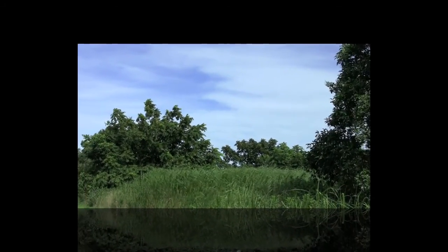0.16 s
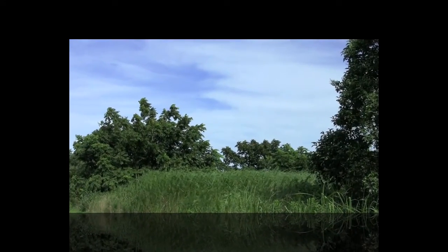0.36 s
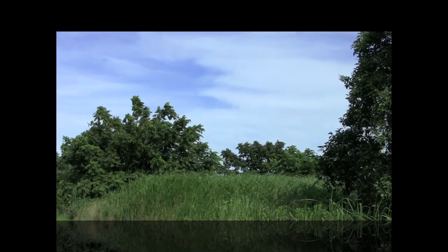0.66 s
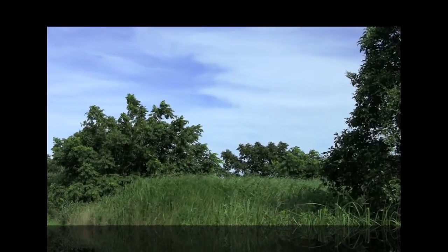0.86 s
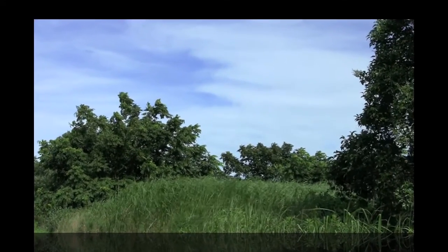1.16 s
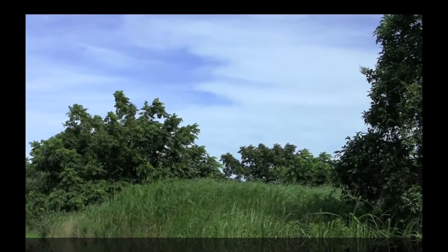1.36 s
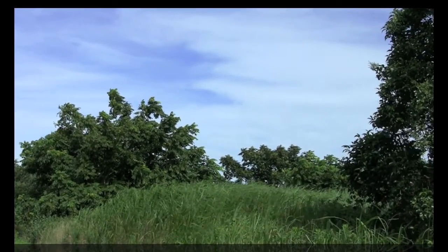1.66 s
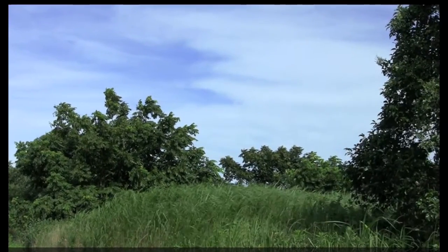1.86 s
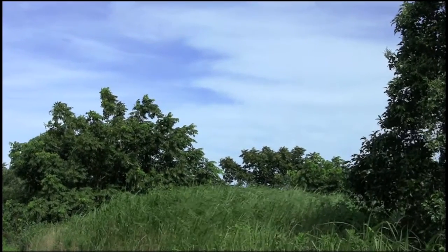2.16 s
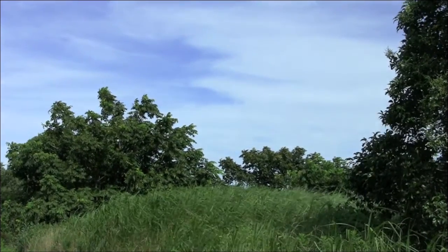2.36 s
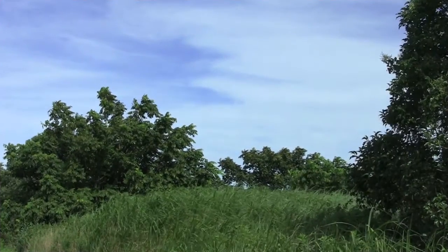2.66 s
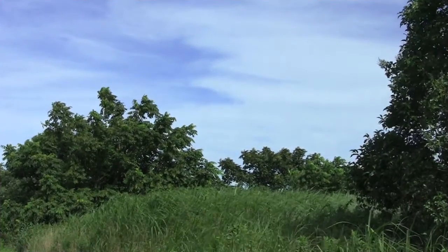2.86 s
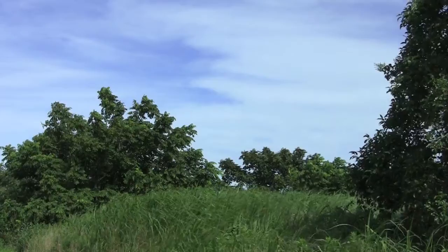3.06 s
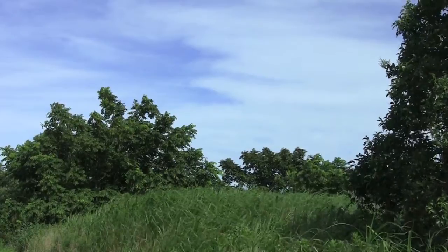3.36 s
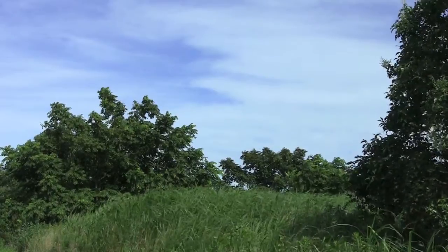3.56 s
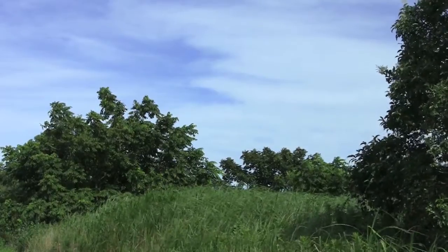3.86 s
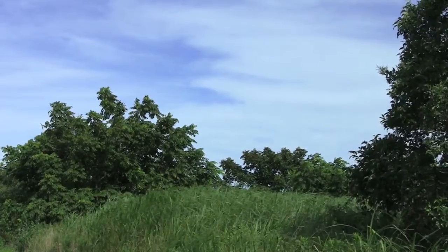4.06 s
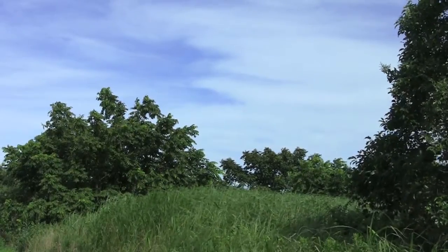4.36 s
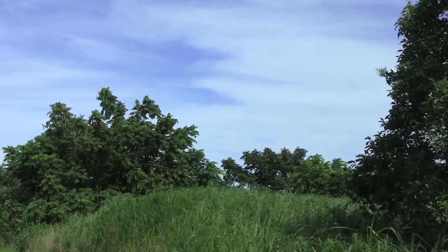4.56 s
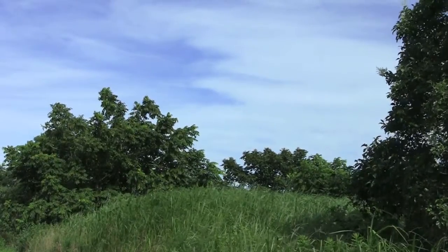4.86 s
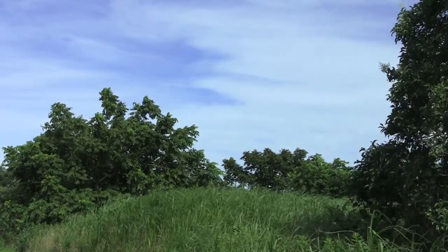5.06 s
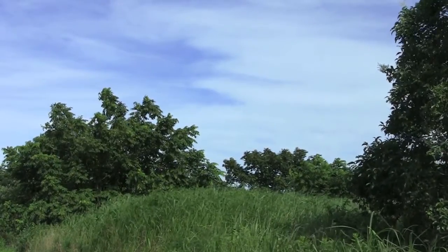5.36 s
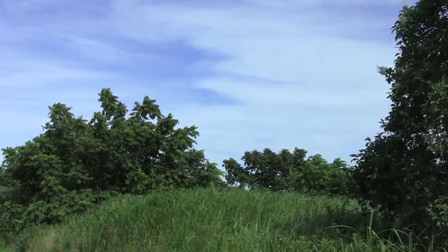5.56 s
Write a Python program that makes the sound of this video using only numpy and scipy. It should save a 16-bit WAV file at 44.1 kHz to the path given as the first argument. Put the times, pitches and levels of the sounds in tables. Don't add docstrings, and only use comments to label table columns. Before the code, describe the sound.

A quiet outdoor scene of tall grass, bushes and trees under a cloudy blue sky. Throughout, a light breeze turns countless leaf contacts into a soft, even hiss, strongest around 2 to 4 kHz, with small uneven flutters and only slight swells near 3 s and the end. Dry stems tick at 0.05 s and snap crisply close by at about 0.3 s. From 0.5 to 1.1 s a cricket scrapes faint, rapid strokes near 8 kHz, strongest around 0.8 to 0.9 s, mixed with light ticks; one more tick comes near 3 s. Below, distant traffic gives a dull, gently swelling rumble and hum. From 2 s a far heavy engine faintly rises in pitch, dips at a gear change around 4.6 s and eases off at 4.9 s. The sound is nearly mono from a camera microphone, with slightly flickering top treble, a steep cut near 15.7 kHz and tiny momentary stereo differences.

```python
import sys
import numpy as np
from scipy import signal
from scipy.fft import rfft, irfft
from scipy.io import wavfile
from scipy.ndimage import uniform_filter1d

SR = 44100
rng = np.random.default_rng(int(sys.argv[2]) if len(sys.argv) > 2 else 0)


def ratio_of_db(decibels):
    return 10 ** (np.asarray(decibels, float) / 20)


def inscribe(sig):
    pcm = np.round(np.clip(np.atleast_2d(sig).T, -1, 1) * 32767)
    wavfile.write(sys.argv[1], SR, pcm.astype(np.int16))


N = 252252

# t/s, level/dB
WIND_LEVEL = [ (0, -43.5), (.6, -43.5), (1.3, -44), (1.9, -44), (2.5, -43), (3.0, -42), (3.45, -42.5),
              (3.95, -42.5), (4.5, -43), (5.0, -43), (5.4, -42), (5.72, -42)]
# f/Hz, density/dB per Hz
LEAF_SPECTRUM = [(470, -40), (800, -20), (914, -10.5), (1180, -6), (1460, -7.5), (2010, -2), (2750, -1),
                 (3180, -1), (3580, -4.5), (4090, -3.5), (10300, -17), (14400, -27)]
# f/Hz, width/Hz, level/dB
CROWN_MODES = [(3170, 590, 2), (890, 71, 3.5), (2765, 400, -2.5), (2150, 91, -0.5), (4060, 180, 0.7),
               (7140, 1200, -1.55)]
# t/s, half length/s, lift/dB, patch pitch f/Hz
PATCH_FLURRIES = [(.045, .03, -1, 11000), (.2, .04, 2, 3000), (0.28, .03, 2.5, 5500),
                  (1.76, 0.049, 2.5, 3460), (2.4, 0.11, 1.1, 1800), (2.75, .03, 1, 2300),
                  (3.217, 0.036, 2.5, 10000), (3.65, .12, 2.5, 7800), (4.14, .03, 2, 3500),
                  (4.4, .03, -0.5, 2500), (4.74, .07, 1.5, 9000), (4.8, 0.19, 1.5, 1500),
                  (5.55, 0.14, 0.5, 3600), (0.54, .1, -1, 3400), (4.4, .08, 0, 3100),
                  (3.602, .08, -1, 3100), (1.25, 0.14, 2.5, 800), (1.52, .1, -1.5, 1900),
                  (4.95, 0.079, 0.5, 3000), (5.4, .12, 1, 1100), (0.99, 0.028, 5.5, 890),
                  (3.1, 0.18, 0, 5500), (3.52, 0.074, 1.5, 4500), (3.9, .1, 0.5, 1560),
                  (1.06, 0.093, -1, 1200), (4.25, .1, 0, 6000), (3.53, 0.092, -0.5, 2800),
                  (5.47, .1, -1, 1900), (4.25, .1, 0.5, 3150), (0.36, .07, -0.5, 3300),
                  (1.86, .06, -0.5, 3000)]
LEAF_FOLLOW, GRASS_FOLLOW, BLADE_FOLLOW = 1, 1.2, 0.57
HISS_DB, FLURRY_OCTAVES = -44.5, 0.89

# closest t/s, half length/s, rumble lift/dB, tyre roar lift/dB
PASSES = [(.0, 0.21, 2, 1), (.85, 0.86, 3, 3.5), (1.6, 0.15, -6, 0), (2.097, 0.65, 4, 1.1),
          (1.85, .12, -0.5, 0), (2.45, 0.16, -1.5, -0.5), (3.2, 0.16, 2, 0), (3.9, 0.24, 1.5, 1.9),
          (4.3, .15, 3, 0.5), (4.65, 0.066, -6, 0), (5.15, 0.48, 2, 0), (5.4, .2, 0.5, 1.6)]
# f/Hz, density/dB per Hz
ROAD_SPECTRUM = [(15, -51), (25, -39), (32, -44), (40, -28.5), (86, -11.5), (134, 0.5), (153, -0.5),
                 (227, -12.5), (335, -15), (461, -10), (590, -15.5), (800, -15), (1040, -34), (1760, -120)]
# f/Hz, width/Hz, level/dB
VALLEY_MODES = [(417, 64, -4), (475, 47, 2), (233, 21, -2), (254, 12, 1.5), (347, 20, -2.5), (452, 16, 0.5),
                (552, 30, -2)]
SUB_DB, RUMBLE_DB, HUM_DB, HUM_RISE_DB_PER_S, ROAR_DB = -59.5, -62, -60, 0.22, -63
TREAD_HZ, TREAD_WIDTH_HZ, TREAD_DB, TREAD_FOLLOW = 1224, 106, -78, 4.2

# t/s, peak level/dB, ring f/Hz
STEM_TICKS = [(.048, -48, 10800), (.049, -51, 10100), (.245, -48, 7750), (.815, -52, 9200),
              (.823, -51, 9400), (.885, -52, 9000), (.618, -59, 11800), (.641, -49, 6600),
              (.648, -56, 11800), (.648, -55, 10200), (.682, -58, 11800), (.737, -56, 11700),
              (.868, -50, 11800), (.886, -56, 11600), (1.008, -53, 10100), (1.139, -54, 9000),
              (1.139, -49, 7300), (1.145, -51, 7300), (2.955, -47, 8000)]
TICK_T60_S = 0.013
# (ring f/Hz, peak level/dB, t60/s)
STEM_SNAPS = [
    (.2805, [(3400, -40, .008), (4200, -36.5, .013), (5350, -35, .009), (6900, -42, .006), (8100, -43, .007), (8700, -42, .009)]),
    (.2818, [(4750, -44, .005), (5350, -41, .008), (6100, -45, .005), (8600, -47, .006)]),
    (.303, [(4050, -39.5, .012), (5300, -46, .008), (6900, -49, .006), (7800, -48, .007), (8600, -48, .007), (9600, -51, .006)]),
    (.3045, [(4200, -41, .03)]),
    (.318, [(3100, -43, .012), (4600, -45, .01), (6300, -48, .007), (7300, -50, .006)]),
]

# t/s, peak level/dB, ring f/Hz
CRICKET_STROKES = [(.487, -50, 8300), (.503, -51, 8350), (.5194, -50, 8170), (.535, -51, 8200),
                   (.5651, -51, 8230), (.738, -51, 8500), (.762, -51, 8500), (.7801, -47, 8450),
                   (.797, -49, 8300), (.814, -45, 8440), (.823, -45, 8500), (.843, -43, 8400),
                   (.849, -48, 8300), (.8699, -43, 8300), (.885, -48, 8300), (.9043, -43, 8150),
                   (.913, -45, 8300), (.95, -54, 8100), (.9742, -44, 8010), (.997, -52, 8200),
                   (1.065, -46.5, 8350), (1.093, -51, 8400), (1.1134, -50, 8220)]
# start t/s, end t/s, wing tone level/dB, overtone level/dB
WING_RUBS = [
    (.46, .58, -65.5, -80),
    (.63, .76, -74, -73),
    (.76, .925, -63.5, -73),
    (.93, 1.15, -69, -75),
]
RUB_FADE_S = 0.027

# multiple, level/dB, fade-in t/s, fade-out t/s
ENGINE_MULTIPLES = [(5, -15, 2.25, 4.0), (7, -14, 2.3, 4.8), (9, -1, 2.3, 4.0), (10, 0, 1.9, 5.0),
                    (12, -7, 2.2, 4.3)]
ENGINE_START_S, ENGINE_HZ, PULL_HZ_PER_S, PULL_FADE_HZ_PER_S2 = 2, 12.98, 1.04, .105
ENGINE_DB, SWELL_S, LIFT_OFF_S, COAST_DB = -61.5, 0.58, 4.94, -12
GEAR_CHANGE_S, GEAR_DIP_DB = 4.6, -5.5

# low f/Hz, high f/Hz, share of blocks kept/0-1, level/dB
TREBLE_BANDS = [(13300, 13600, .98, 0), (13600, 13750, .95, 0), (13750, 13900, .93, 0),
                (13900, 14050, .9, 0), (14050, 14200, .88, 0), (14200, 14350, .85, 0),
                (14350, 14500, .88, 0), (14500, 14700, .14, -1), (14700, 14900, .1, -1),
                (14950, 15180, .08, 1), (15120, 15750, .27, -10)]
# t/s, centre f/Hz
STEREO_SLIPS = [(.988, 7000), (1.523, 6100), (2.684, 5500), (2.707, 12100), (3.125, 4800), (3.125, 9000),
                (3.137, 11000), (3.148, 10700), (3.938, 10400), (4.983, 5000), (4.983, 10400),
                (4.983, 13200), (5.215, 11400), (5.517, 8300)]
SLIP_WIDTH_HZ, SLIP_DB = 1540, -2
CONVERTER_OFFSET = -.0003


def unit(x):
    return x / np.sqrt(np.mean(x ** 2))


def curves(table):
    s, *columns = np.transpose(table)
    return [np.interp(np.arange(N) / SR, s, c) for c in columns]


def band(x, lo_hz, hi_hz, edge=0.35):
    freq = np.fft.rfftfreq(len(x), 1 / SR)
    slope = 2 ** (max(edge, .002) / 2)

    def rise(hz):
        return np.interp(freq, [hz / slope, hz * slope], [0, 1])

    return irfft(rfft(x) * (rise(lo_hz) - rise(hi_hz)), len(x))


def colour(x, points):
    hz, db = np.transpose(points)
    log_freq = np.log(np.fft.rfftfreq(N, 1 / SR) + 1)
    return irfft(rfft(x) * ratio_of_db(np.interp(log_freq, np.log(hz), db)), N)


def resonate(x, modes):
    for hz, width_hz, db in modes:
        x = x + (ratio_of_db(db) - 1) * signal.lfilter(*signal.iirpeak(hz, hz / width_hz, SR), x)
    return x


def walk(rate):
    hold = int(SR / rate)
    steps = np.repeat(rng.standard_normal(N // 100), hold)[:N]
    return unit(uniform_filter1d(uniform_filter1d(steps, hold), hold))


def bump(at_s, half_s):
    return np.exp(-((np.arange(N) / SR - at_s) / half_s) ** 2)


def add_contact(out, s, db, hz, t60_s, rise_s):
    t = np.arange(int(.06 * SR)) / SR
    envelope = (1 - np.exp(-t / rise_s)) * np.exp(-np.log(1000) * t / t60_s)
    contact = envelope * np.sin(2 * np.pi * hz * t)
    k = int(s * SR)
    out[k:k + len(t)] += ratio_of_db(db) * contact / np.abs(contact).max()


def traffic():
    return sum(bump(s, half_s) * np.array([[rumble_db], [roar_db]])
               for s, half_s, rumble_db, roar_db in PASSES)


def foliage():
    wind_db = curves(WIND_LEVEL)[0]
    wind_db = wind_db - wind_db.mean()
    tyre_db = traffic()[1] - 1.3
    swells = tyre_db, LEAF_FOLLOW * wind_db, GRASS_FOLLOW * wind_db, BLADE_FOLLOW * wind_db
    flurries = [(hz, db * bump(s, half_s)) for s, half_s, db, hz in PATCH_FLURRIES]

    contacts = rng.standard_normal(N) * ratio_of_db(1.27 * rng.exponential(size=N))
    leaves = colour(contacts, LEAF_SPECTRUM[:-1] + [(16500, -30.0)])
    hiss = ratio_of_db(HISS_DB) * unit(resonate(leaves, CROWN_MODES))

    edges_hz = 100 * 2 ** np.arange(2.5, 7.7, .5)
    out, shared = 0, walk(rate=25)
    for lo, hi in zip(edges_hz[:-1], edges_hz[1:]):
        place = np.interp(np.log(lo * hi) / 2, np.log([1000, 2000, 3000, 5000, 11000]), [0, 1, 1, 2, 3])
        swell_db = sum(max(1 - abs(place - k), 0) * swell for k, swell in enumerate(swells))
        for hz, lift_db in flurries:
            octaves = np.log2(lo * hi / hz ** 2) / 2
            swell_db = swell_db + lift_db * np.exp(-(octaves / FLURRY_OCTAVES) ** 2)
        fine = np.clip(np.log2(lo / 2500), 0, 1)
        flutter_db = (0.22 + 0.043 * fine) * shared
        flutter_db += (0.39 + 0.13 * fine) * walk(rate=10) + 0.39 * fine * walk(rate=45)
        out = out + band(hiss, lo, hi) * ratio_of_db(swell_db + flutter_db)
    return out


def road():
    rumble_db, roar_db = traffic()
    noise = resonate(colour(rng.standard_normal(N), ROAD_SPECTRUM), VALLEY_MODES)
    noise /= np.std(band(noise, 90, 190))
    hum_db = HUM_DB + HUM_RISE_DB_PER_S * np.arange(N) / SR

    sub = band(noise, 10, 98.4) * ratio_of_db(SUB_DB)
    rumble = band(noise, 102.0, 197.0) * ratio_of_db(RUMBLE_DB + rumble_db)
    hum = band(noise, 195.7, 556) * ratio_of_db(hum_db)
    roar = band(noise, 543, 1200) * ratio_of_db(ROAR_DB + 1.37 * roar_db)
    half_hz = TREAD_WIDTH_HZ / 2
    tread = band(rng.standard_normal(N), TREAD_HZ - half_hz, TREAD_HZ + half_hz, edge=.06)
    tread = unit(tread) * ratio_of_db(TREAD_DB + TREAD_FOLLOW * roar_db)
    return sub + rumble + tread + hum + roar


def stems():
    out = np.zeros(N)
    for s, db, hz in STEM_TICKS:
        add_contact(out, s, db, hz, TICK_T60_S, rise_s=0.00039)
    for s, modes in STEM_SNAPS:
        for hz, db, t60_s in modes:
            add_contact(out, s, db, hz, t60_s, rise_s=0.00019)
    return out


def cricket():
    out, t = np.zeros(N), np.arange(N) / SR
    for s, db, hz in CRICKET_STROKES:
        for tooth, chance in enumerate(rng.standard_normal(4)):
            tooth_db = db - 3.5 - 1.4 * tooth + 1.5 * chance
            tooth_hz = 8250 + .7 * (hz - 8250) + 70 * chance
            add_contact(out, s + 0.0019 * tooth, tooth_db, tooth_hz, .007, rise_s=0.00072)

    teeth = rng.standard_normal((2, N)) * (rng.random((2, N)) < 400 / SR)
    wing, overtone = np.zeros(N), np.zeros(N)
    for start, end, wing_db, overtone_db in WING_RUBS:
        rub = np.clip(np.minimum(t - start, end - t) / RUB_FADE_S + .5, 0, 1)
        wing += rub * ratio_of_db(wing_db)
        overtone += rub * ratio_of_db(overtone_db)
    out += unit(band(teeth[0], 7500, 8300, edge=.07)) * wing
    return out + unit(band(teeth[1], 11500, 12100, edge=.04)) * overtone


def engine():
    t, out = np.arange(N) / SR, 0
    run_s = t - ENGINE_START_S
    cycle_hz = ENGINE_HZ + PULL_HZ_PER_S * run_s - PULL_FADE_HZ_PER_S2 * run_s ** 2
    phase = 2 * np.pi * np.cumsum(cycle_hz) / SR
    not_pulling = np.clip(1 - run_s / SWELL_S, 0, 1) + np.clip((t - LIFT_OFF_S) / .2, 0, 1)
    db = ENGINE_DB + COAST_DB * not_pulling + GEAR_DIP_DB * bump(GEAR_CHANGE_S, 0.17)
    for multiple, order_db, start, end in ENGINE_MULTIPLES:
        heard = np.clip(np.minimum(t - start, end - t) / .2, 0, 1)
        level = heard * ratio_of_db(order_db + 1.2 * walk(rate=4))
        out = out + level * np.sin(multiple * phase + multiple ** 2 + .2 * walk(rate=5))
    return np.sqrt(2) * ratio_of_db(db) * out


def scene():
    return np.tile(foliage() + road() + stems() + cricket() + engine(), (2, 1))


def intermittent_top(x):
    out = band(x, 0.5, 13300, edge=.004)
    for lo_hz, hi_hz, kept, db in TREBLE_BANDS:
        blocks = 1. * (rng.random(N // 1500 + 1) < kept)
        gate = uniform_filter1d(np.repeat(blocks, 1500)[:N], 500)
        out = out + band(x, lo_hz, hi_hz, edge=.004) * ratio_of_db(db) * gate
    return out


def stereo_slips(x):
    side, half = np.zeros(N), 700
    for s, hz in STEREO_SLIPS:
        k = int(s * SR)
        edges_hz = hz - SLIP_WIDTH_HZ / 2, hz + SLIP_WIDTH_HZ / 2
        burst = band(rng.standard_normal(2 * half), *edges_hz, edge=.02) * np.hanning(2 * half) ** .5
        local_rms = np.std(band(x[k - half:k + half], *edges_hz))
        side[k - half:k + half] += ratio_of_db(SLIP_DB) * local_rms * unit(burst)
    return side * np.array([[1], [-1]])


def roll_off(x):
    return signal.sosfilt(signal.butter(12, 15750, fs=SR, output="sos"), x)


def record(dry):
    mono = dry[0]
    mix = intermittent_top(mono) + CONVERTER_OFFSET + stereo_slips(mono)
    return roll_off(mix)


dry = scene()
out = record(dry)
inscribe(out)
```